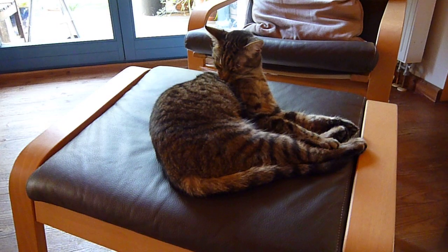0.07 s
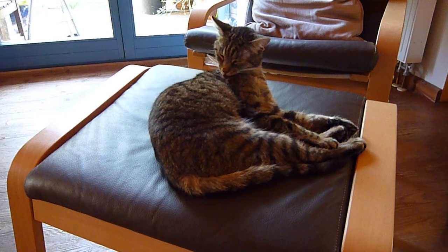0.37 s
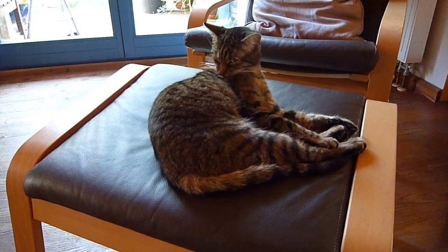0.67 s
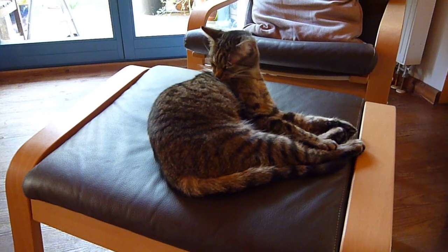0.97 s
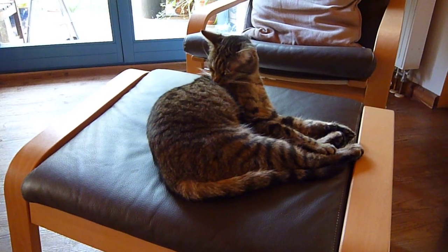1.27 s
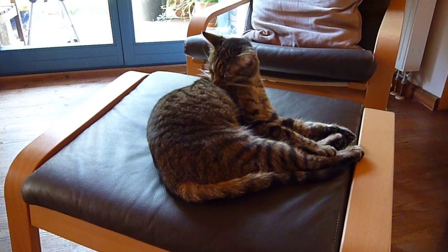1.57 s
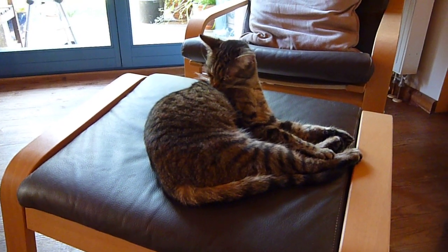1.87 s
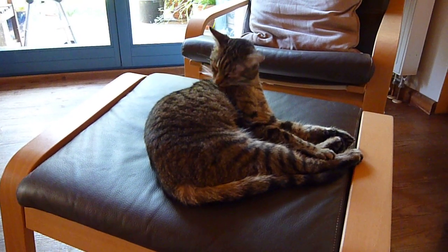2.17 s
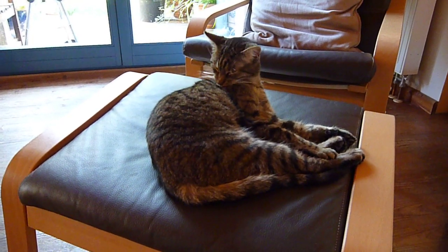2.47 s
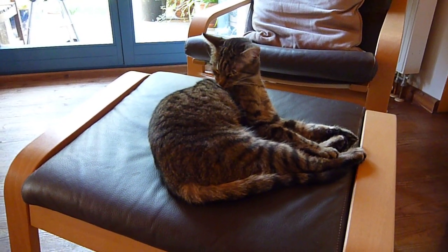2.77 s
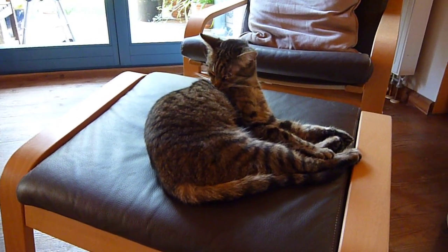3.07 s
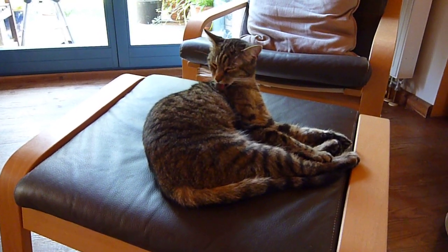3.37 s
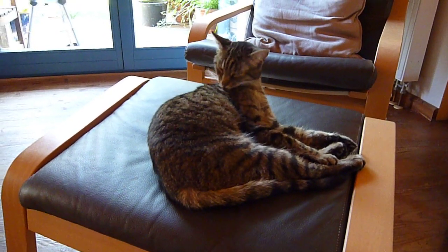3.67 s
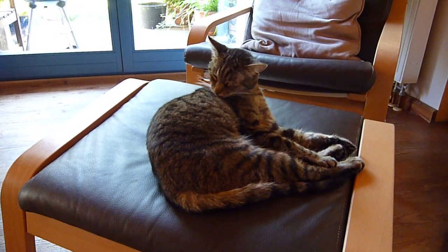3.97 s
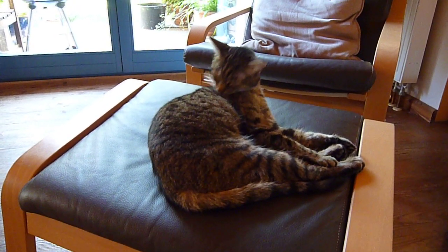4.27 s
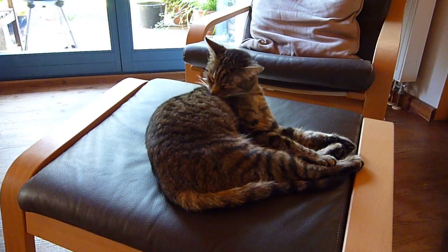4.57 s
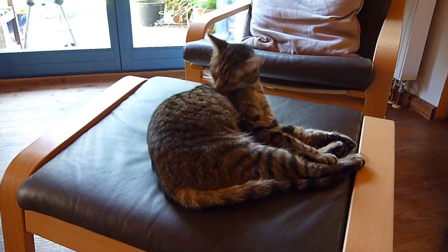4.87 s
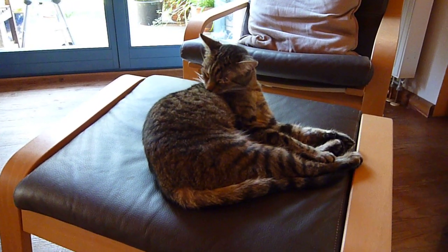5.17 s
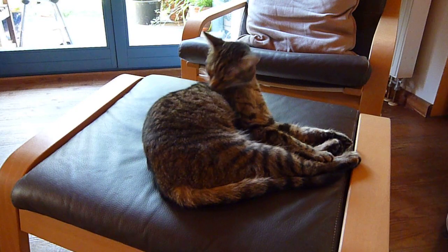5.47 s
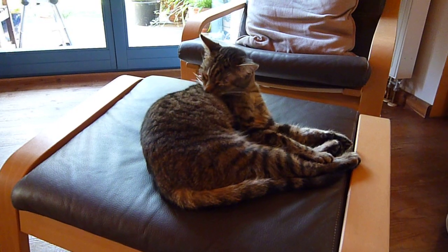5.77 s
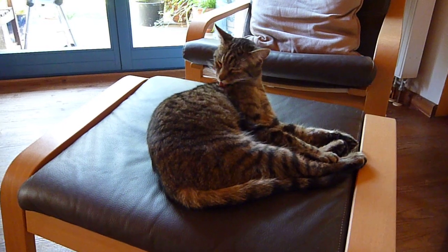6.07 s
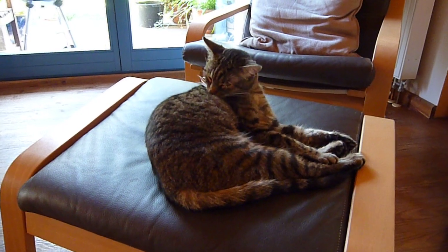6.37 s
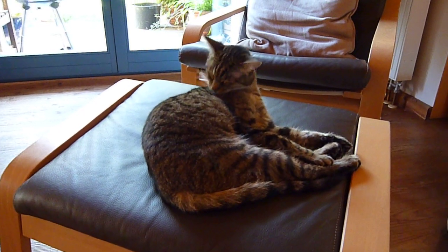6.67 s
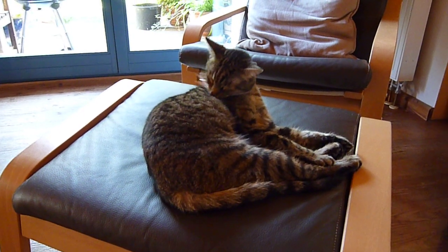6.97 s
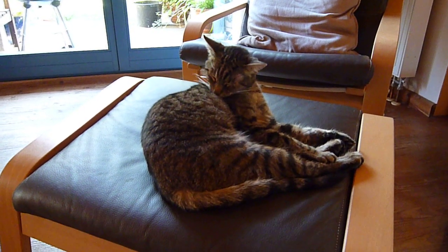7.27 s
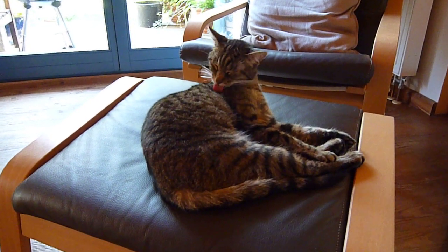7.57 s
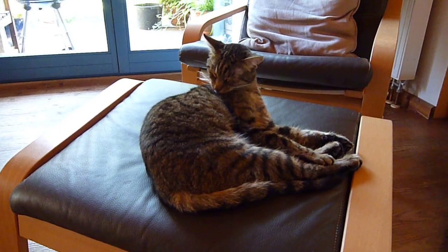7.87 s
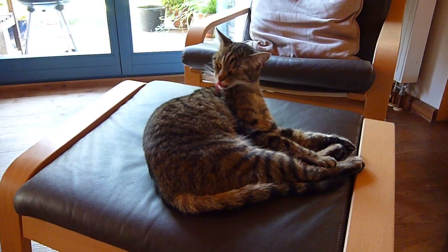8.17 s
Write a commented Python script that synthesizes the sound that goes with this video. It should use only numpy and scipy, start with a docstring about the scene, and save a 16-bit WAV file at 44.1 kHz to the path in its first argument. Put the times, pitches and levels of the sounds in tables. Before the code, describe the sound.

A single brief knock on the microphone interrupts soft, steady room noise, thin hiss and faint crackling static.

```python
"""Soft room air, a dull broadband noise, fills a quiet living room where a cat rests silently.
It is heard through a small hand-held camera, whose preamplifier adds hiss, a thin whine and a fine
electrical crackle of short pulses. One bump rings the damped modes of the camera body,
and a few very faint gliding squeaks follow."""
import sys
import numpy as np
from scipy import signal
from scipy.fft import rfft, irfft
from scipy.io import wavfile

SR = 44100
rng = np.random.default_rng(int(sys.argv[2]) if len(sys.argv) > 2 else 0)


def output_pcm(signal):
    """Save a mono or channel-first signal as 16-bit PCM at the path in sys.argv[1].

    Samples are clipped to [-1, 1] before scaling.
    """
    pcm = np.clip(np.atleast_2d(signal).T, -1, 1) * 32767
    wavfile.write(sys.argv[1], SR, np.round(pcm).astype(np.int16))


N = 362502


def room_air(level_db=-58, swell_db=0.23, waver_db=0.53, rumble_hz=350):
    """Amplitude modulation of dull noise: the whole barely swells, and its rumble wavers on its own."""
    # spectrum of the room's air: frequency_hz, relative_db
    air_spectrum = [(20, -29), (40, -16.5), (65, -9), (100, -5.5), (170, -0.5), (320, -2.2), (550, -5.5),
                    (900, -9), (1500, -12), (2800, -17.5), (7000, -28)]
    air = noise(air_spectrum)
    rumble = coloured(air, [(rumble_hz / 2, 0), (rumble_hz, -3), (2 * rumble_hz, -30)])
    wavering = rumble * gain_of(waver_db * drift(rate_hz=6))
    return gain_of(level_db + swell_db * drift(rate_hz=2.6)) * (air - rumble + wavering)


def preamplifier(hiss_db=-61, whine_hz=6666.6, whine_db=-87.5):
    """Electronic noise: a nearly white hiss with one spectral line, a thin whine."""
    # spectrum of the hiss: frequency_hz, relative_db
    hiss_spectrum = [(100, -2), (2000, -2), (4000, -1.75), (6500, -3), (7400, -4)]
    whine = np.sqrt(2) * np.sin(2 * np.pi * whine_hz * np.arange(N) / SR)
    return gain_of(hiss_db) * noise(hiss_spectrum) + gain_of(whine_db) * whine


def crackle(clock_hz=320.8, wander=.006, buzz_db=-48,
            spike_db=-34, spike_share=.14, spread_db=11, upward_share=.22):
    """Crosstalk: an unsteady clock leaks a pulse train, a faint buzz; some pulses carry a sharp spike."""
    # the sharpest electrical ticks: start_s, level_db
    sharp_ticks = [(.4579, -32.3), (.4729, -34), (.867, -35), (.9677, -31), (1.6088, -33), (1.7158, -32.7),
                   (1.763, -35), (1.9071, -32), (2.3033, -33), (2.3124, -33.4), (2.4935, -32.8),
                   (2.5957, -32), (2.68, -31.8), (3.5807, -35), (4.2379, -34), (4.4262, -31),
                   (6.4694, -32.2), (6.5652, -32.4), (6.8854, -32.6), (7.1757, -33), (7.2688, -34),
                   (7.3586, -32.3)]
    cycles = np.cumsum(clock_hz * (1 + wander * drift(rate_hz=12))) / SR
    onsets = np.flatnonzero(np.diff(np.floor(cycles)))
    chance, weakness, side = rng.random((len(onsets), 3)).T
    pulses, spikes = np.zeros((2, N))
    pulses[onsets] = gain_of(buzz_db)
    polarity = np.sign(side - upward_share)
    spikes[onsets] = (chance < spike_share) * polarity * gain_of(spike_db - spread_db * weakness)
    for start_s, level_db in sharp_ticks:
        add(spikes, start_s, gain_of([level_db]))
    buzz = coloured(pulses - pulses.mean(), [(320, 7.5), (1600, 5.0), (3000, -0.5), (6000, -10)])
    ticks = coloured(spikes, [(500, 0), (2500, -1.5), (5000, -0.9)])
    return -(buzz + ticks)  # both mostly pull the voltage down


def camera_bump(at_s=.41195, gain_db=-17, contact_s=0.0008, low_cut_hz=222):
    """Modal response: a half-sine push rings the heavily damped body, too close to stir the room."""
    # modes of the camera body: frequency_hz, level_db, t60_s
    body_modes = [(101, 3, .0255), (1540, 5, 0.011), (1740, 9.5, 0.0031)]
    t = np.arange(SR // 10) / SR
    # neighbouring modes push the microphone in opposite directions
    ring = sum((-1) ** k * gain_of(db - 60 * t / t60) * np.cos(2 * np.pi * hz * t)
               for k, (hz, db, t60) in enumerate(body_modes))
    push = np.cos(np.pi * np.clip((np.arange(N) / SR - at_s) / contact_s, -.5, .5))
    knock = signal.oaconvolve(push / push.sum(), ring)[:N]
    # the microphone passes no deep bass, so the knock swings back once
    low_cut = signal.butter(2, low_cut_hz, "high", fs=SR, output="sos")
    return gain_of(gain_db) * signal.sosfilt(low_cut, knock)


def squeaks(waver=.013, skew=0.55):
    """Frequency modulation: short gliding tones swell fast and fade slower, nearly masked by the hiss."""
    # faint squeaks: start_s, pitch_hz, peak_db, length_s, glide_share
    tones = [(1.090, 2310, -60.5, .045, .05), (1.092, 3430, -69, .018, 0), (1.846, 6410, -63, .017, -.02),
             (2.119, 6450, -64, .013, -.04), (2.158, 6460, -63, .028, -.04)]
    out = np.zeros(N)
    unsteady = 1 + waver * drift(rate_hz=150)
    for start_s, pitch_hz, peak_db, length_s, glide_share in tones:
        progress = np.linspace(0, 1, round(length_s * SR)) ** skew
        glide_hz = pitch_hz * (1 + glide_share * (progress - .5))
        wavering_hz = glide_hz * unsteady[round(start_s * SR):][:len(progress)]
        envelope = gain_of(peak_db) * np.sin(np.pi * progress) ** 2
        add(out, start_s, envelope * np.sin(2 * np.pi * np.cumsum(wavering_hz) / SR))
    return out


def noise(spectrum):
    """Spectral shaping of white noise by (frequency_hz, relative_db) points, at unit rms."""
    return unit_rms(coloured(rng.standard_normal(N), spectrum))


def drift(rate_hz):
    """Low-pass noise: a random wandering up to about rate_hz, at unit rms."""
    bins = np.fft.rfftfreq(N, 1 / SR)
    return unit_rms(irfft(rfft(rng.standard_normal(N)) * np.exp(-(bins / rate_hz) ** 2), N))


def coloured(x, spectrum):
    """Zero-phase filtering by a curve of (frequency_hz, gain_db) points."""
    hz, db = np.transpose(spectrum)
    bins = np.fft.rfftfreq(N, 1 / SR)
    curve_db = np.interp(np.log(bins + 1), np.log(hz + 1), db)
    return irfft(rfft(x) * gain_of(curve_db), N)


def gain_of(db):
    """Decibels as an amplitude ratio."""
    return 10 ** (np.asarray(db) / 20)


def unit_rms(x):
    """Normalisation to an rms of one."""
    return x / np.sqrt(np.mean(x ** 2) + 1e-20)


def add(mix, start_s, sound):
    """Superposition of a sound on the mix from start_s."""
    part = mix[round(start_s * SR):][:len(sound)]
    part += sound[:len(part)]


def scene():
    """Superposition of room and camera noises in one channel."""
    return (room_air() + preamplifier() + crackle() + camera_bump() + squeaks())[None]


def record(dry, edge_hz=8800, dc_offset=-.0375):
    """Band limiting: the camera cuts the high treble, and its converter rests slightly off zero."""
    # the camera's treble response, notched at the top of its band: frequency_hz, gain_db
    treble_response = [(7000, 0), (7500, -2.5), (7800, -8), (8000, -22), (8150, -16), (8400, -16),
                       (8750, -23)]
    low_pass = signal.firwin(255, edge_hz, window=("kaiser", 8), fs=SR)
    return signal.oaconvolve(coloured(dry, treble_response), low_pass[None], "same") + dc_offset


dry = scene()
out = record(dry)
output_pcm(out)
```